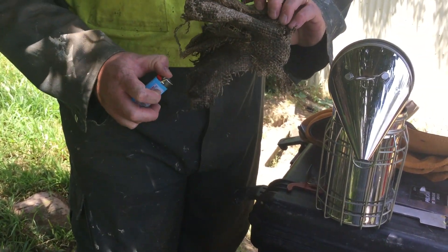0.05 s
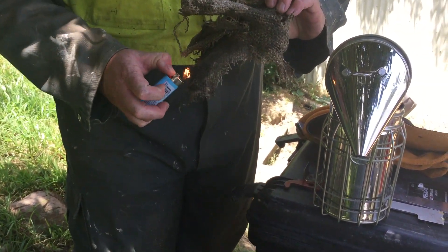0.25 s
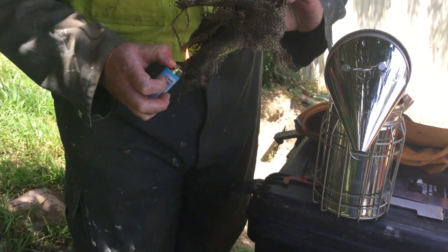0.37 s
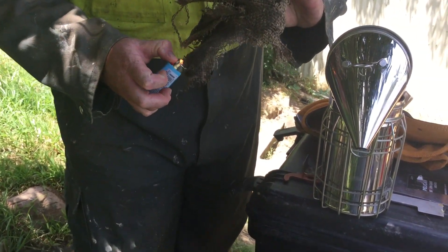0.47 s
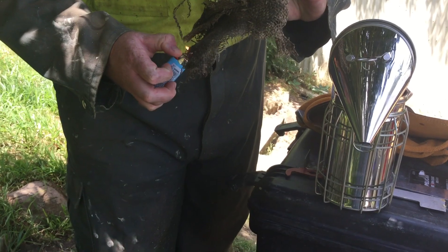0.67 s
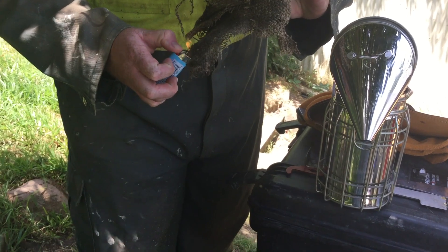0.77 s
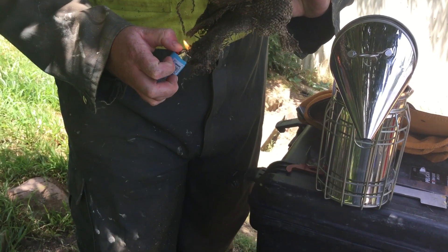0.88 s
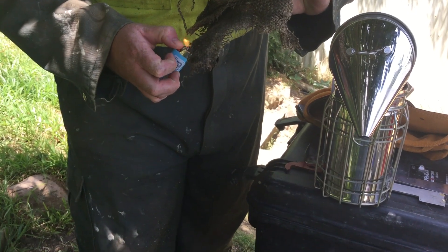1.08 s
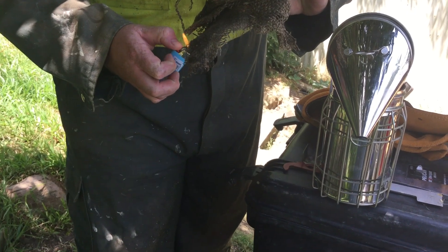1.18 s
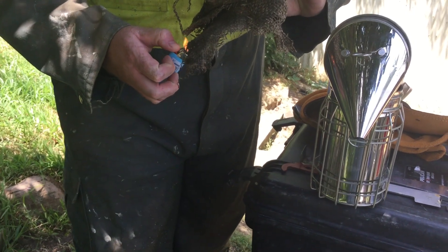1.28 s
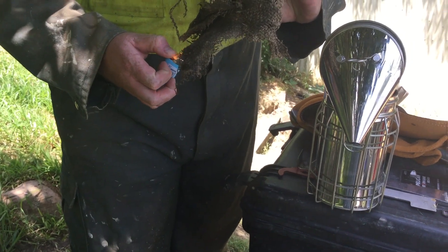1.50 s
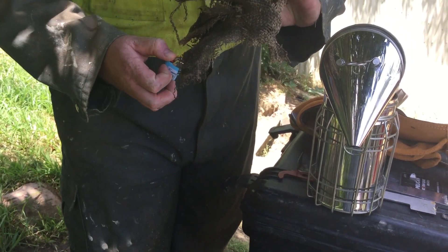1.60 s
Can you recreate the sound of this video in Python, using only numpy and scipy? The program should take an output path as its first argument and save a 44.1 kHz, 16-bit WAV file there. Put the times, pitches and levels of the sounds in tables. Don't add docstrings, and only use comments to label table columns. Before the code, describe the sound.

A pocket lighter is struck once with a sharp, gritty click over quiet outdoor rumble and hiss

```python
import sys
import numpy as np
from scipy import signal
from scipy.fft import rfft, irfft
from scipy.io import wavfile
from scipy.ndimage import uniform_filter1d

SR = 44100
rng = np.random.default_rng(int(sys.argv[2]) if len(sys.argv) > 2 else 0)


def wav_out(sig):
    wavfile.write(sys.argv[1], SR, np.round(np.clip(np.atleast_2d(sig).T, -1, 1) * 32767).astype(np.int16))


def attenuation_scalar(level_db):
    decades = np.asarray(level_db, float) / 20
    return 10 ** decades


N = 72765


def rms_one(x):
    return x / np.sqrt(np.mean(x ** 2) + 1e-20)


def curve(rows):
    s, value = np.transpose(rows)
    return np.interp(np.arange(N) / SR, s, value)


def colour(x, spectrum):
    hz, db = np.transpose(spectrum)
    f = np.maximum(np.arange(N // 2 + 1) * SR / N, 1)
    below_db = np.maximum(np.log2(hz[0] / f), 0) * 24
    gain_db = np.interp(np.log(f), np.log(hz), db) - below_db
    return rms_one(irfft(rfft(x) * attenuation_scalar(gain_db), N))


def drift(rate_hz):
    r = np.exp(-2 * np.pi * rate_hz / SR)
    white = rng.standard_normal(N + SR)
    return rms_one(signal.lfilter([1], [1, -2 * r, r * r], white)[SR:])


def resonance(x, hz, width_hz):
    r = np.exp(-np.pi * width_hz / SR)
    zeros = np.array([1, 0, -1]) * (1 - r * r) / 2
    poles = [1, -2 * r * np.cos(2 * np.pi * hz / SR), r * r]
    return signal.lfilter(zeros, poles, x)


def ring(clicks, hz, t60_s):
    r = attenuation_scalar(-60 / (t60_s * SR))
    w = 2 * np.pi * hz / SR
    return signal.lfilter([0, np.sin(w)], [1, -2 * r * np.cos(w), r * r], clicks + 1e-18)


def click(s, db):
    out = np.zeros(N)
    np.add.at(out, (np.asarray(s) * SR).astype(int), attenuation_scalar(db))
    return out


def hump(start_s, length_s):
    t = np.arange(N) / SR
    return np.sin(np.pi * np.clip((t - start_s) / length_s, 0, 1))


# start in seconds, peak in
# dB, ring in Hz.
WHEEL_TEETH = [(.2290, -52, 7900), (.2298, -56, 5800), (.2352, -47, 9000), (.2368, -43, 8600),
               (.2385, -46, 10500), (.2392, -46, 5900), (.2390, -46, 7200), (.2447, -47, 2800),
               (.2468, -23, 5400), (.2490, -36, 5400), (.2503, -37, 5500), (.2530, -44, 4000),
               (.2456, -39, 13000), (.2468, -35, 12400), (.2516, -45, 13000), (.2414, -38, 8900),
               (.2423, -38, 7600), (.24345, -28, 7700), (.24425, -27, 7800), (.24495, -25, 7500),
               (.24565, -16, 8200), (.2463, -21, 8900), (.24685, -19, 9100), (.24705, -25, 7400),
               (.24765, -20, 8900), (.2481, -28, 9000), (.2492, -27, 8700), (.2504, -34, 9300),
               (.2510, -34, 7200), (.2524, -32, 7900), (.2530, -40, 5600), (.2580, -43, 9000),
               (.2608, -43, 9300)]
# time in seconds, grating level in dB.
WHEEL_STROKE = [
    (.221, -80),
    (.228, -62),
    (.236, -53),
    (.244, -48),
    (.247, -40),
    (.253, -47),
    (.256, -54),
    (.268, -64),
    (.276, -80),
]
# frequency in Hz, density in dB per Hz.
GRATE_COLOUR = [(1500, -19), (2700, -5.5), (4000, -7), (6000, -3), (8800, 3), (10800, -7), (14500, -9.5),
                (16200, -20)]
TOOTH_CYCLES, TOOTH_CRACK_DB = 1.45, -21
GRITS_PER_S, GRIT_SPREAD_DB = 5700, 1.1


def wheel():
    t, out = np.arange(N) / SR, np.zeros(N)
    for s, db, hz in WHEEL_TEETH:
        age = np.clip((t - s) * hz / TOOTH_CYCLES, 0, 50)
        swell = age * np.exp(1 - age)
        out += attenuation_scalar(db) * swell * np.sin(2 * np.pi * hz * (t - s))
    s, db, hz = np.transpose(WHEEL_TEETH)
    cracks = click(s + TOOTH_CYCLES / hz, db + TOOTH_CRACK_DB)
    out += np.diff(cracks, 2, prepend=[0, 0])
    sizes = attenuation_scalar(GRIT_SPREAD_DB * np.minimum(rng.exponential(1, N), 4)) * rng.choice([-1, 1], N)
    grit = sizes * (rng.random(N) < GRITS_PER_S / SR)
    stroke_db = curve(WHEEL_STROKE)
    return out + attenuation_scalar(stroke_db) * colour(grit, GRATE_COLOUR) * (stroke_db > -79)


# start in seconds, peak in dB.
LEVER_KNOCKS = [
    (.2372, -47),
    (.2390, -42),
    (.2414, -44),
    (.2472, -31),
    (.2483, -35),
    (.2496, -33),
    (.2511, -40),
]
# frequency in Hz, level in dB, t60 in seconds.
BODY_MODES = [(780, -26, 0.017), (1175, -23.5, 0.033), (2260, -11, 0.0059), (2830, -1.5, 0.0058),
              (4120, -13.5, .01), (4186, -9, 0.023), (5360, -6, 0.015), (7480, -6, 0.0092),
              (13200, -11.5, 0.0055), (14200, -7, 0.0055), (15530, -15, 0.0033)]


def lever():
    s, db = np.transpose(LEVER_KNOCKS)
    spread_db = rng.normal(0, 2.4, (len(s), len(BODY_MODES)))
    out = np.zeros(N)
    for k, (hz, level_db, t60_s) in enumerate(BODY_MODES):
        strikes = click(s, db + level_db + spread_db[:, k])
        out += resonance(ring(strikes, hz, t60_s), hz, 0.34 * hz)
    return out


# time in seconds, level in dB.
GAS_FLOW_DB = [
    (.251, -92),
    (.258, -48),
    (.269, -54),
    (.275, -61),
    (.286, -59),
    (.300, -62),
    (.310, -64),
    (.318, -69),
    (.40, -92),
]
# frequency in Hz, density in dB per Hz.
GAS_COLOUR = [(1500, -21), (3800, -20), (6500, -11), (7900, -10), (8850, 2), (10000, -14), (13000, -23),
              (16000, -28)]
CATCH_S, CATCH_CUT_HZ = .299, 9700


def gas():
    flow_db = curve(GAS_FLOW_DB)
    flow = (flow_db > -91) * attenuation_scalar(flow_db + 1.5 * drift(90))
    jet = colour(rng.standard_normal(N), GAS_COLOUR)
    dull = signal.sosfiltfilt(signal.butter(6, CATCH_CUT_HZ, fs=SR, output="sos"), jet)
    caught = np.clip((np.arange(N) / SR - CATCH_S) / .004, 0, 1)
    return flow * (jet + .65 * caught * (dull - jet))


# start in seconds, peak in dB, frequency in Hz.
THUMB_PUSHES = [
    (.232, -57, 130),
    (.246, -47, 150),
    (.2475, -52, 230),
    (.264, -57, 110),
]
THUMP_RISE_S = .0035


def thump():
    out = np.zeros(N)
    for s, db, hz in THUMB_PUSHES:
        t = np.clip(np.arange(N) / SR - s, 0, 1)
        push = t / THUMP_RISE_S * np.exp(1 - t / THUMP_RISE_S)
        out += attenuation_scalar(db) * push * np.sin(2 * np.pi * hz * t)
    return out


# frequency in Hz, density in dB per Hz.
RUMBLE_COLOUR = [(35, -14), (60, 4.5), (110, -12), (250, -10), (460, -22.5), (800, -25.5), (1250, -32.5),
                 (2400, -60.5)]
# time in seconds, level in dB.
TRAFFIC_SWELL = [
    (0.0, -54),
    (0.39, -56),
    (0.61, -63),
    (1.138, -57.5),
    (1.374, -54),
    (1.65, -54),
]
# frequency in Hz, width in Hz, level in dB.
TRAFFIC_HUM = [(95, 1.8, -65), (144.6, 14, -76), (192.4, 9.8, -77.5), (246.2, 26.3, -74.5)]
# start in seconds, length in seconds, level in dB.
DEEP_SURGES = [(-.02, 0.069, -56), (0.055, .07, -55.5), (0.242, 0.085, -60), (.32, .06, -60),
               (0.373, .1, -52.5), (0.479, 0.072, -54.5), (.585, 0.078, -62.5), (.72, 0.061, -57.5),
               (0.794, 0.068, -59.5), (.85, 0.067, -57.5), (.92, 0.064, -61), (1.038, 0.081, -54.5),
               (1.15, 0.094, -59), (1.222, 0.14, -55.5), (1.326, 0.053, -57), (1.366, .13, -57),
               (1.483, 0.048, -56.5), (1.528, 0.071, -54), (1.58, .09, -55)]
SURGE_LOW_HZ, SURGE_HIGH_HZ = 47.5, 109
BED_DB, BED_FOLLOWS = -5.0, 0.16


def traffic():
    level_db = curve(TRAFFIC_SWELL)
    mean_db = level_db.mean()
    swell_db = level_db - mean_db
    bed_white, hum_white, _, surge_white = rng.standard_normal((4, N))
    hum = np.zeros(N)
    for hz, width_hz, db in TRAFFIC_HUM:
        order = resonance(resonance(hum_white, hz, width_hz), hz, 3 * width_hz)
        hum += attenuation_scalar(db) * rms_one(order)
    band = signal.butter(2, [SURGE_LOW_HZ, SURGE_HIGH_HZ], "band", fs=SR, output="sos")
    lows = signal.sosfilt(band, surge_white)
    lows = lows / np.sqrt(uniform_filter1d(lows ** 2, size=800) + 2e-4)
    surge = sum(attenuation_scalar(db) * hump(s, length_s) for s, length_s, db in DEEP_SURGES)
    bed_db = mean_db + BED_DB + BED_FOLLOWS * swell_db + 1.4 * drift(12)
    bed = colour(bed_white, RUMBLE_COLOUR) * attenuation_scalar(bed_db)
    return bed + 0.81 * lows * surge + attenuation_scalar(swell_db) * hum


# frequency in Hz, width in Hz, centre in seconds, spread in seconds, level in dB.
ENGINE_BANDS = [(256, 65, 0.163, 0.0083, -57.5), (343, 54, 0.13, .03, -66.5), (426, 30, .225, 0.02, -57.5),
                (404, 40, .29, .03, -62.5), (741, 36, .21, .035, -70.5), (667, 230, .3, .05, -69),
                (887, 44, .29, 0.051, -75), (1050, 110, 0.27, 0.052, -69.5), (423, 50, .375, 0.022, -70.5),
                (732, 110, .37, 0.022, -75), (1010, 220, .37, .04, -76.5), (149.7, 23, .16, 0.012, -59)]
THROB_HZ, THROB_DEPTH = 33, .3


def engine():
    t, out = np.arange(N) / SR, np.zeros(N)
    for hz, width_hz, centre_s, spread_s, db in ENGINE_BANDS:
        band = resonance(rng.standard_normal(N), hz, width_hz)
        band = rms_one(resonance(band, hz, 2 * width_hz))
        band = band / np.sqrt(uniform_filter1d(band ** 2, size=1300) + .1)
        out += band * attenuation_scalar(db) * np.exp(-.5 * ((t - centre_s) / spread_s) ** 2)
    return out * (1 + THROB_DEPTH * np.cos(2 * np.pi * THROB_HZ * (t - .225)))


# frequency in Hz, density in dB per Hz.
LEAF_COLOUR = [(700, -3), (1500, -3), (3000, -5), (6500, -9), (10500, -12), (12500, -17.5), (14300, -24),
               (15500, -38)]
LEAF_DB = -78.5


def leaves():
    flutter_db = .5 * drift(10)
    return attenuation_scalar(LEAF_DB + flutter_db) * colour(rng.standard_normal(N), LEAF_COLOUR)


# start in seconds, level in dB, frequency in Hz, length in seconds.
INSECT_TICKS = [
    (.156, -73, 6000, .005),
    (.179, -73, 12000, .005),
    (.572, -81, 6600, .006),
    (.615, -79, 6000, .006),
    (.796, -74, 6000, .006),
    (1.244, -77, 6000, .006),
    (1.21, -79, 3400, .008),
]


def insects():
    t, out = np.arange(N) / SR, np.zeros(N)
    for s, db, hz, length_s in INSECT_TICKS:
        out += attenuation_scalar(db) * hump(s, length_s) ** 2 * np.sin(2 * np.pi * hz * t)
    return out


# start in seconds, peak in dB.
DRY_SNAPS = [
    (.0065, -76),
    (.0612, -68),
    (.0620, -71),
    (.1232, -75),
    (1.023, -76),
]


def snaps():
    contacts = click(*np.transpose(DRY_SNAPS))
    return ring(contacts, 8500, .003) + .4 * ring(contacts, 13500, .002)


# start in seconds, length in seconds, level in dB.
CLOTH_BRUSHES = [
    (-.08, .3, -84),
    (.4, .25, -88),
    (.89, .16, -83),
    (1.18, .11, -88),
]


def cloth():
    brush = sum(attenuation_scalar(db) * hump(s, length_s) for s, length_s, db in CLOTH_BRUSHES)
    rough = brush * attenuation_scalar(2.0 * drift(67))
    return rough * colour(rng.standard_normal(N), [(5000, -8), (8000, 0), (14000, -12), (16000, -24)])


MIC_HZ, MIC_WIDTH_HZ, MIC_LIFT_DB = 8550, 900, 4.6


def scene():
    air = leaves() + insects() + snaps() + cloth()
    air = air + attenuation_scalar(MIC_LIFT_DB) * resonance(air, MIC_HZ, MIC_WIDTH_HZ)
    lighter = wheel() + lever() + thump() + gas()
    return (lighter + traffic() + engine() + air)[None]


def low_pass(x):
    return signal.sosfilt(signal.butter(12, 16120, fs=SR, output="sos"), x)


LOW_CUT_HZ, TOP_HZ = 34, 16150


def record(dry):
    x = signal.sosfilt(signal.butter(4, LOW_CUT_HZ, "high", fs=SR, output="sos"), dry)
    x = signal.sosfilt(signal.cheby2(20, 60, TOP_HZ, fs=SR, output="sos"), x)
    return low_pass(x)


dry = scene()
out = record(dry)
wav_out(out)
```